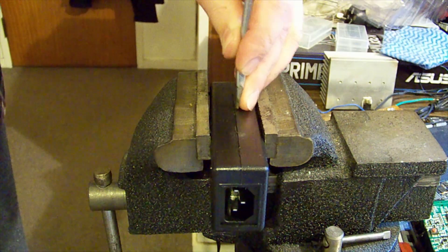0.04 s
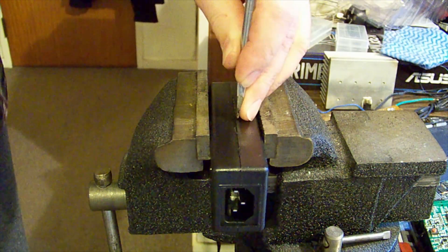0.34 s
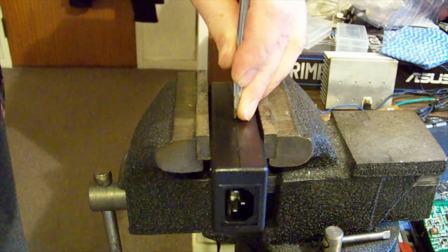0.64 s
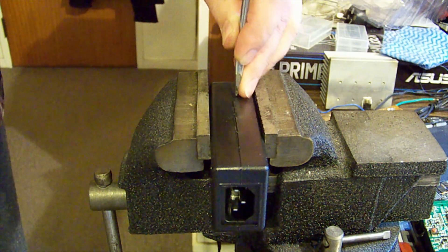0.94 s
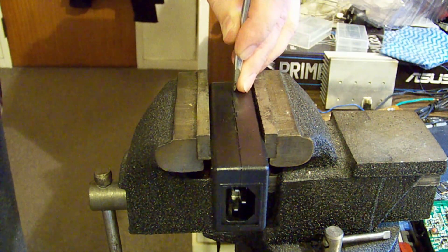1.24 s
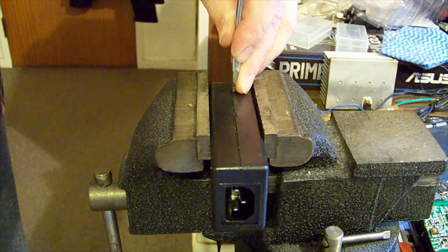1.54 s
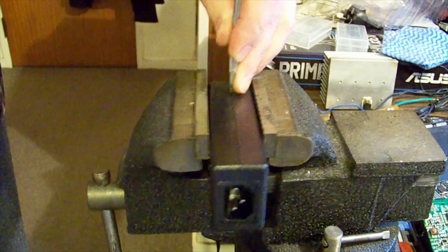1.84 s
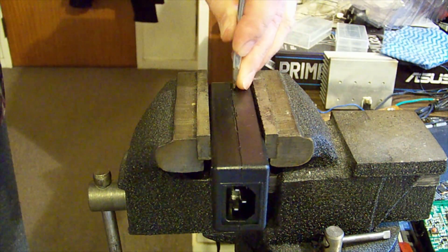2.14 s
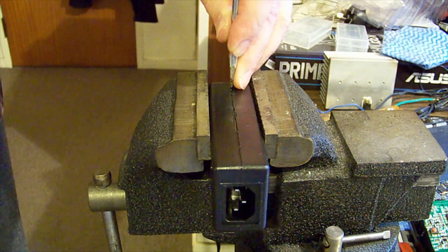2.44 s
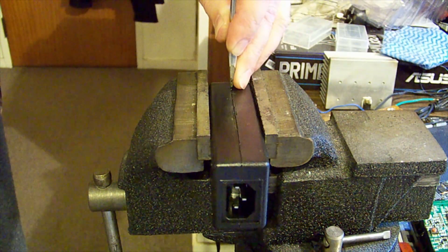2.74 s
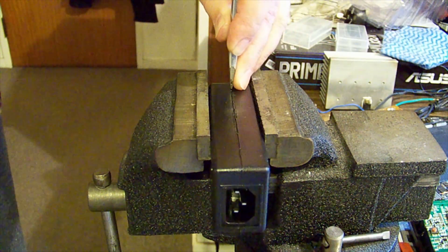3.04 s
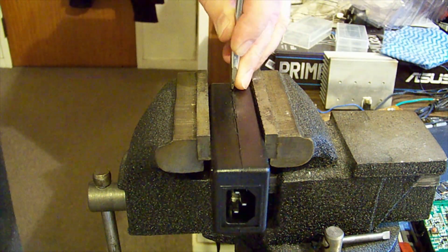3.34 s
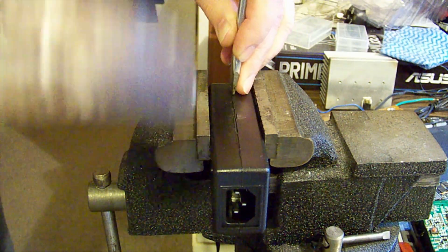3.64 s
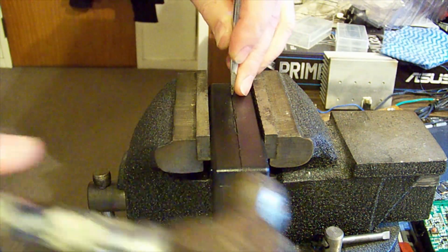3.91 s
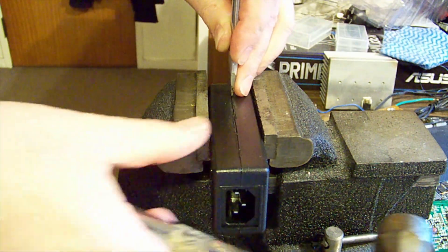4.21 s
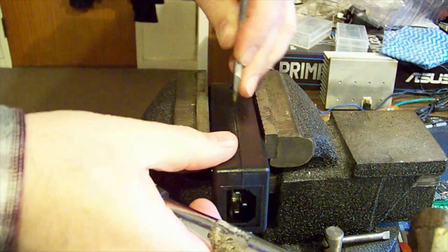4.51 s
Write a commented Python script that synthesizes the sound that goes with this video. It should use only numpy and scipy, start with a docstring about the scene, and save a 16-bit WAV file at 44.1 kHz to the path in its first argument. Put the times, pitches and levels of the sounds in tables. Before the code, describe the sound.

A hammer drives a blade into plastic clamped in a vise: light hollow taps and three hard, cracking blows in a workshop.

```python
"""A hammer drives a flat blade into the seam of a plastic brick clamped in a steel bench vise.
Light, hollow aiming taps lead up to three hard, biting blows. Each is a crack with a short ring from
blade, brick and vise, then a small bounce; the bench booms and the workshop echoes.
Twice the blade slides along the seam, rasping and squeaking, and the tools tick as they are handled.
The hard blows overload a close microphone, whose limiter holds the echo up as it recovers."""
import sys
import numpy as np
from scipy import signal
from scipy.fft import rfft, irfft
from scipy.io import wavfile
from scipy.ndimage import uniform_filter1d

SR = 44100
rng = np.random.default_rng(int(sys.argv[2]) if len(sys.argv) > 2 else 0)


def output_pcm(signal):
    """Save a mono or channel-first signal as 16-bit PCM at the path in sys.argv[1].

    Samples are clipped to [-1, 1] before scaling.
    """
    pcm = np.clip(np.atleast_2d(signal).T, -1, 1) * 32767
    wavfile.write(sys.argv[1], SR, np.round(pcm).astype(np.int16))


N = 205968
MIC_TOP_HZ = 7950

# stereo width of the knocks and their echo: f/Hz, side against mid/dB
STEREO_WIDTH = [(150, -12.5), (600, -10), (1800, -4), (4000, -3.5), (7500, -3.5)]


def from_db(db):
    """Decibels to gain."""
    return 10 ** (np.asarray(db) / 20)


def unit_rms(x):
    """Scale to rms 1."""
    return x / np.sqrt(np.mean(x ** 2) + 1e-20)


def at_hz(points, hz, column=1):
    """Read a table along a log-frequency axis."""
    points = np.array(points)
    return np.interp(np.log(np.maximum(hz, 1)), np.log(points[:, 0]), points[:, column])


def panned(pan_db):
    """Left and right gains; positive leans left."""
    return from_db(np.array([[.5], [-.5]]) * pan_db)


def add(track, start_s, sound):
    """Mix a stereo sound into the track."""
    start = max(int(start_s * SR), 0)
    track[:, start:start + sound.shape[1]] += sound[:, :N - start]


def stereo_noise(gain, side_db, size):
    """Noise with a given gain per frequency, mostly common to both channels; rms 1."""
    mid, side = gain * np.exp(2j * np.pi * rng.random((2, size // 2 + 1)))
    return unit_rms(irfft(mid + from_db(side_db) * side * [[1], [-1]], size))


def room_tone(level_db=-56.5):
    """A steady bed of room rumble and microphone hiss."""
    # spectrum of the bed: f/Hz, relative density/dB
    spectrum = [(15, -22.5), (25, -2), (60, -1.5), (130, -3), (220, -4), (300, -11), (430, -9.5),
                (550, -11.5), (1100, -14), (3700, -18.5), (6900, -21), (8000, -34.5), (10000, -58)]
    hz = np.fft.rfftfreq(N, 1 / SR)
    return from_db(level_db) * stereo_noise(from_db(at_hz(spectrum, hz)), side_db=-4, size=N)


def blade_slides(slips_per_s=3500, attack_s=.033, release_db_per_s=247.5):
    """Steel dragged over plastic: dense little slips under a pressure that swells, eases and lets go."""
    # strokes along the seam: t/s, length/s, level/dB, sag while sliding/(dB/s)
    strokes = [(-.04, 0.18, -43, 48), (0.781, 0.13, -44, 7)]
    # resonances of the sliding blade: f/Hz, width/Hz, level/dB
    resonances = [(1680, 1900, 2.5), (2560, 890, 8.5), (3910, 150, 4.5), (4730, 1600, -5.5),
                  (6920, 1200, -8.5)]
    out = np.zeros((2, N))
    for start_s, length_s, level_db, sag_db_per_s in strokes:
        t = np.arange(N) / SR - start_s
        slips = (rng.random(N) < slips_per_s / SR) * stereo_noise(1, side_db=-4.5, size=N)
        rasp = np.zeros((2, N))
        for k, (hz, width, db) in enumerate(resonances):
            band = signal.lfilter(*signal.iirpeak(hz, hz / width, fs=SR), slips)
            rasp += (-1) ** k * from_db(db) * band
        fade_db = sag_db_per_s * np.clip(t, 0, length_s) + release_db_per_s * np.maximum(t - length_s, 0)
        pressure = np.clip(t / attack_s, 0, 1) * from_db(level_db - fade_db)
        out += pressure * panned(3) * unit_rms(rasp)
    return out


def blade_squeaks(pitch_jitter=.065):
    """The blade catches and lets go: an unsteady tone that swells and fades as it glides."""
    # squeaky glides: t/s, length/s, level/dB, start f/Hz, end f/Hz
    glides = [ (0.062, 0.12, -59, 3700, 5260), (.095, 0.077, -57, 2900, 3300),
              (0.791, 0.081, -45, 2150, 2800), (0.806, 0.057, -49, 4130, 3950),
              (0.852, 0.08, -44, 2900, 3730)]
    out = np.zeros((2, N))
    for start_s, length_s, level_db, from_hz, to_hz in glides:
        along = np.linspace(0, 1, int(length_s * SR))
        wobble = unit_rms(uniform_filter1d(rng.standard_normal(SR), size=24))[:len(along)]
        flutter = np.abs(uniform_filter1d(rng.standard_normal(SR), size=500))[:len(along)]
        hz = (from_hz + (to_hz - from_hz) * along) * (1 + pitch_jitter * wobble)
        tone = unit_rms(flutter * np.sin(2 * np.pi * np.cumsum(hz) / SR))
        add(out, start_s, from_db(level_db) * panned(3) * np.sin(np.pi * along) * tone)
    return out


def workshop_echo(build_s=.0026, ripple_db=2.5, size=32768):
    """The tail of one knock: a diffuse wash from all directions that dies band by band."""
    # colour and decay of the room: f/Hz, relative density/dB, t60/s
    room = [(60, -14.5, .45), (129, -12, 0.75), (212, -8, 0.62), (322.3, -7.5, 0.59), (615, -5.5, 0.33),
            (1180, -5.5, 0.44), (1677, -2.5, .45), (2287, -.5, 0.4), (2680, -3.5, 0.37), (4045, -11, 0.34),
            (6500, -13, 0.39), (7650, -24.5, .38)]
    t, hz = np.arange(size) / SR, np.fft.rfftfreq(size, 1 / SR)
    # each knock shares its energy unevenly among the work's many resonances
    uneven_db = ripple_db * unit_rms(uniform_filter1d(rng.standard_normal(len(hz)), size=60))
    colour = from_db(at_hz(room, hz) + uneven_db) * (hz < MIC_TOP_HZ)
    diffuse = rfft(stereo_noise(colour, side_db=at_hz(STEREO_WIDTH, hz), size=size))
    edges_hz = [30, 300, 1400, 3200, MIC_TOP_HZ]
    echo = np.zeros((2, size))
    for low, high in zip(edges_hz, edges_hz[1:]):
        t60 = at_hz(room, (low + high) / 2, column=2)
        echo += irfft(diffuse * (hz >= low) * (hz < high)) * from_db(-60 * t / t60)
    return echo * (1 - np.exp(-(t / build_s) ** 2))


def bench_boom(size=16384):
    """The heavy vise passes the push on slowly: the bench's loose low modes swell, then die."""
    # low modes of the bench: f/Hz, level/dB, swell time/s
    modes = [(63, -15.5, 0.03), (93.6, -8, 0.032), (125.3, 1.5, 0.02), (154.4, -2, 0.022),
             (209.7, -14, 0.025), (223, -12, 0.018)]
    t, out = np.arange(size) / SR, np.zeros((2, size))
    for hz, mode_db, swell_s in modes:
        phase = rng.uniform(0, 2 * np.pi) + rng.normal(0, .12, (2, 1))
        detuned_hz = hz * (1 + rng.normal(0, .016))
        swell = t / swell_s * np.exp(1 - t / swell_s)
        out += from_db(mode_db) * swell * np.sin(2 * np.pi * detuned_hz * t + phase)
    return out


def coloured(sound, treble_db, body_db, rings, ring_octaves=.1):
    """Hard contacts are bright, soft ones bring out the body; the blade's seat favours two rings."""
    # where the vise sits in the stereo image: f/Hz, left minus right/dB
    balance = [(500, -2), (1200, -0.5), (2100, 2), (4000, 4.5), (7500, -3.5)]
    treble_hz, body_low_hz, body_high_hz = 3200, 280, 1250
    size = 2 * sound.shape[1]
    hz = np.fft.rfftfreq(size, 1 / SR) + 1
    shelf_db = treble_db / (1 + (treble_hz / hz) ** 8)
    hump_db = body_db / (1 + (hz / body_high_hz) ** 4 + (body_low_hz / hz) ** 4)
    peaks_db = sum(lift_db / (1 + (np.log2(hz / ring_hz) / ring_octaves) ** 2) ** 2
                   for ring_hz, lift_db in rings)
    gain = from_db(shelf_db + hump_db + peaks_db) * panned(at_hz(balance, hz))
    return irfft(rfft(sound, size) * gain)[:, :size // 2]


def knock(t60, rise_s, chatter_s=.0035, ring_db=-11.5, size=8192):
    """The blade chatters in the seam for a few milliseconds, then the clamped work rings out."""
    # spectrum of the crack: f/Hz, relative density/dB
    spectrum = [(25, -14), (60, -17.5), (200, -13.5), (320, -18.5), (470, -7), (650, -8), (900, -5),
                (1300, -5.5), (1700, 0), (2300, 0), (3400, -2), (4200, -6), (5000, -7), (6300, -2.5),
                (7300, -8), (8200, -20.5)]
    # blade, brick and vise ringing together: f/Hz, level/dB, t60/s
    modes = [(655, -9, 0.073), (798.4, -3.5, .04), (1017, -4, 0.049), (1605, 1.5, 0.062), (1737, 0, .04),
             (2197, -5, 0.059), (2280, -3, 0.076), (2366, -5, 0.082), (2705, -8.5, 0.057),
             (3440, -10.5, 0.082), (3290, -15, 0.1), (5250, -9, 0.082), (5950, -11, 0.027)]
    t, hz = np.arange(size) / SR, np.fft.rfftfreq(size, 1 / SR)
    decay_time = np.maximum(t - chatter_s, 0)
    envelope = (1 - np.exp(-t / rise_s)) * from_db(-60 * decay_time / t60)
    chatter = rfft(envelope * stereo_noise(1, side_db=at_hz(STEREO_WIDTH, hz), size=size))
    # so short a contact reaches all frequencies about evenly
    chatter /= np.sqrt(uniform_filter1d(np.mean(np.abs(chatter) ** 2, axis=0), size=90))
    crack = unit_rms(irfft(chatter * from_db(at_hz(spectrum, hz)))) * np.sqrt(np.mean(envelope ** 2))
    # the plastic soaks up the top first: an extra 450 dB/s above 4500 Hz
    treble = irfft(rfft(crack) / (1 + (4500 / (hz + 1)) ** 8))
    crack -= treble * (1 - from_db(-450 * decay_time))
    ring = np.zeros((2, size))
    for mode_hz, mode_db, mode_t60 in modes:
        phase = rng.uniform(0, 2 * np.pi) + rng.normal(0, .13, (2, 1))
        ring += from_db(mode_db - 60 * t / mode_t60) * np.sin(2 * np.pi * mode_hz * t + phase)
    ring *= from_db(ring_db) * np.minimum(t / chatter_s, 1)
    return (crack + ring)[:, :size // 2]


def contact(rings, treble_db, body_db, t60, echo_db, rise_s=.0011):
    """One knock and its echo in the same colour; the room blurs the rings."""
    blurred = [(hz, .75 * lift_db) for hz, lift_db in rings]
    sound = from_db(echo_db) * coloured(workshop_echo(), treble_db, body_db, blurred, ring_octaves=.14)
    add(sound, 0, coloured(knock(t60, rise_s), treble_db, body_db, rings))
    return sound


def tool_ticks():
    """The tools shift in the hand: short, thin contacts, too light to move the bench."""
    # handling ticks: t/s, level/dB, treble/dB, first ring f/Hz, second ring f/Hz, ring lift/dB
    ticks = [ (1.304, -46.5, -1.5, 2360, 3450, 5), (1.536, -48, 0, 6910, 2590, 3),
             (3.7408, -60, 18, 4570, 6400, 6), (4.139, -58.5, 4, 3020, 4030, 9),
             (4.449, -57, 1.5, 1795, 6200, 7.5), (4.6163, -32, -4.5, 1950, 3350, 17)]
    out = np.zeros((2, N))
    for start_s, level_db, treble_db, first_hz, second_hz, lift_db in ticks:
        rings = [(first_hz, lift_db), (second_hz, lift_db)]
        tick = contact(rings, treble_db, body_db=-5.5, t60=.0084, echo_db=-17)
        add(out, start_s, from_db(level_db) * tick)
    return out


def hammer_blows(bite_from_db=-3, bite_span_db=1.5):
    """Taps sound hollow, hard blows bite and fill the room; each blow and its bounce shake the bench."""
    # blows, with two rings set by the blade's seat: t/s, level/dB, treble/dB, t60/s, first ring f/Hz,
    # lift/dB, second ring f/Hz, lift/dB, bounce delay/s, bounce level/dB, bounce ring f/Hz
    blows = [ (.283, -11, 0, .028, 1764, 10.5, 2140, 10.5, 0.045, -29.5, 1173),
             (.562, 5.5, -1, .036, 2200, 3.5, 3380, 3, .097, -29, 1100),
             (1.1553, -26.5, -2.5, .025, 2350, 5, 3540, 6.5, .028, -42.5, 2350),
             (1.4898, -22.5, -1, .032, 690, 7, 2480, 3, .04, -31, 1220),
             (1.8078, 9, 3, .019, 2495, 6.5, 5180, 1, 0.1, -27, 495),
             (2.193, -31.5, -7, .035, 1780, 6, 2390, 5, .082, -47, 1230),
             (2.526, -11.7, -3, .046, 1590, 7.5, 2746, 10.5, 0.039, -23.5, 1200),
             (2.821, 6.5, 1, .018, 1200, 5.5, 2186, 4, 0.12, -38, 1700)]
    # a hollow tap: body/dB, echo/dB, rise/s
    hollow = (6, -19.2, .001)
    # a blow that bites into the plastic: body/dB, echo/dB, rise/s
    biting = (-3, -14.2, .0008)
    out = np.zeros((2, N))
    for (start_s, level_db, treble_db, t60, first_hz, first_db, second_hz, second_db,
         bounce_s, bounce_db, bounce_hz) in blows:
        bite = 1 / (1 + np.exp((bite_from_db - level_db) / bite_span_db))
        body_db, echo_db, rise_s = (1 - bite) * np.array(hollow) + bite * np.array(biting)
        echo_db += 10 * np.log10(t60 / .03)   # a longer knock feeds the echo more
        rings = [(first_hz, first_db), (second_hz, second_db)]
        add(out, start_s, from_db(level_db) * contact(rings, treble_db, body_db, t60, echo_db, rise_s))
        add(out, start_s, from_db(-29 + .7 * level_db) * bench_boom())
        # the hammer falls back once, soft and dull
        bounce_rings = [(bounce_hz, 10.5), (2470, 2)]
        bounce = contact(bounce_rings, treble_db=-11.5, body_db=11, t60=.045, echo_db=-20)
        add(out, start_s + bounce_s, from_db(bounce_db) * bounce)
        add(out, start_s + bounce_s, from_db(bounce_db - 8.5) * bench_boom())
    return out


def scene():
    """Hammering, tool ticks and the sliding blade over the quiet room."""
    return room_tone() + hammer_blows() + tool_ticks() + blade_slides() + blade_squeaks()


def limiter(x, threshold_db=-2, release_db_per_s=125, attack_s=.0014):
    """The gain dives a little too late for a peak and climbs back at a steady rate."""
    over_db = np.maximum(20 * np.log10(np.abs(x).max(axis=0) + 1e-9) - threshold_db, 0)
    ramp_db = release_db_per_s * np.arange(N) / SR
    reduction_db = np.maximum.accumulate(over_db + ramp_db) - ramp_db
    lag = np.exp(-1 / (attack_s * SR))
    return x * from_db(-signal.lfilter([1 - lag], [1, -lag], reduction_db))


def record(dry, cutoff_hz=15300):
    """A narrow-band microphone and a limiter; what slips past clips and spills into the top octave."""
    # dips in the microphone's response: f/Hz, width/Hz
    notches = [(296, 150), (965, 58)]
    for hz, width in notches:
        dry = signal.lfilter(*signal.iirnotch(hz, hz / width, fs=SR), dry)
    overloaded = np.clip(limiter(dry), -1.1, 1.1)
    mic_lowpass = signal.cheby1(14, .3, MIC_TOP_HZ - 100, fs=SR, output="sos")
    clipped = np.clip(signal.sosfilt(mic_lowpass, overloaded), -1, 1)
    return signal.sosfilt(signal.ellip(8, .1, 70, cutoff_hz, fs=SR, output="sos"), clipped)


dry = scene()
out = record(dry)
output_pcm(out)
```